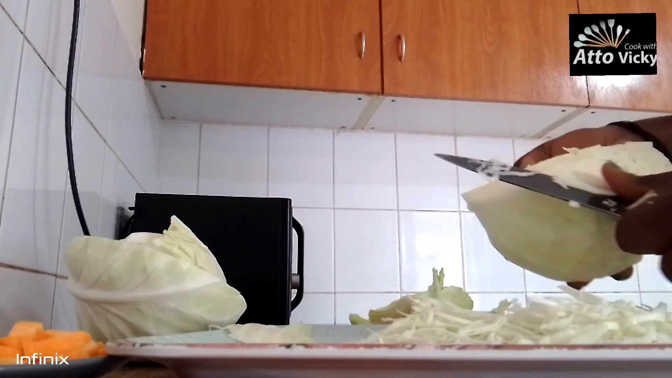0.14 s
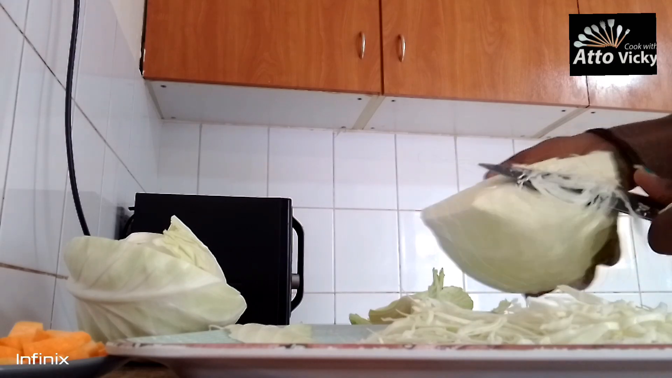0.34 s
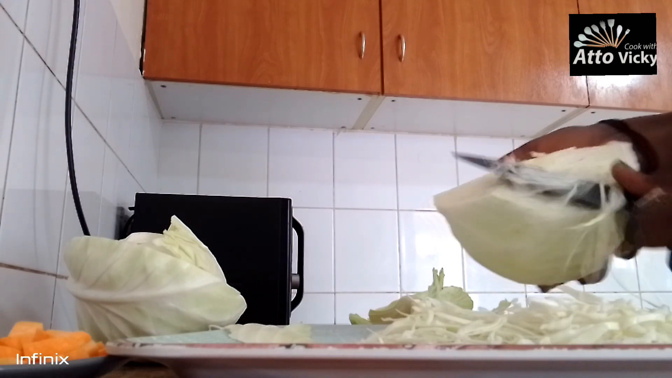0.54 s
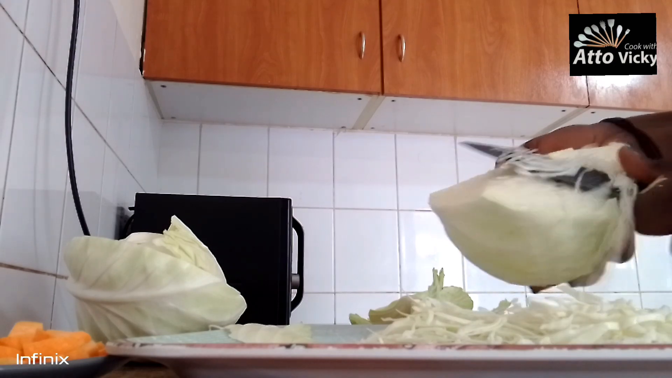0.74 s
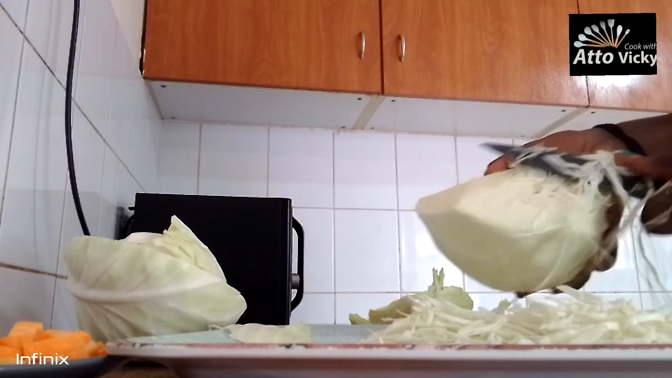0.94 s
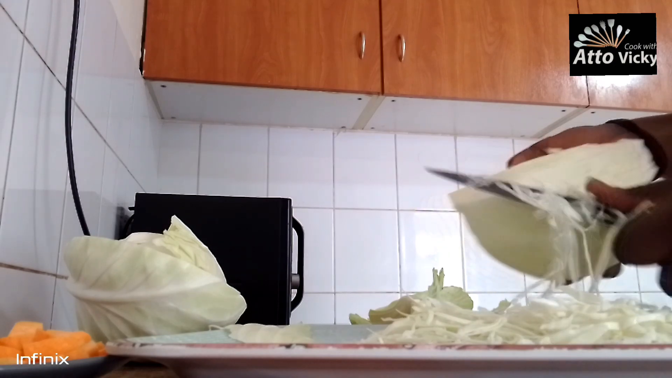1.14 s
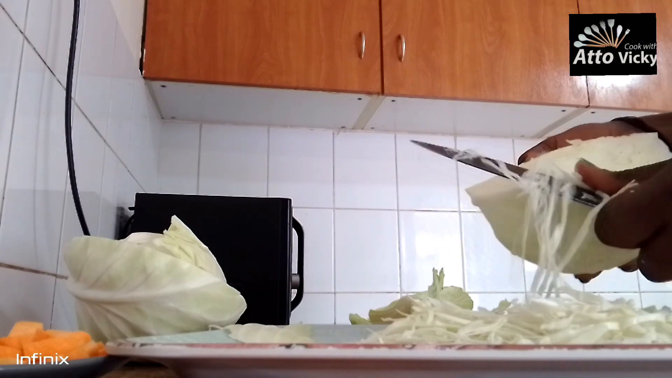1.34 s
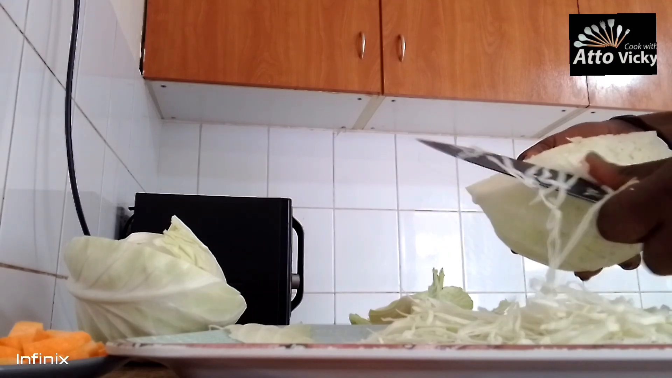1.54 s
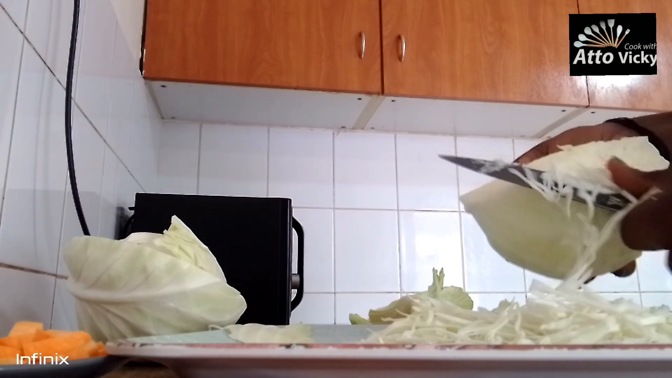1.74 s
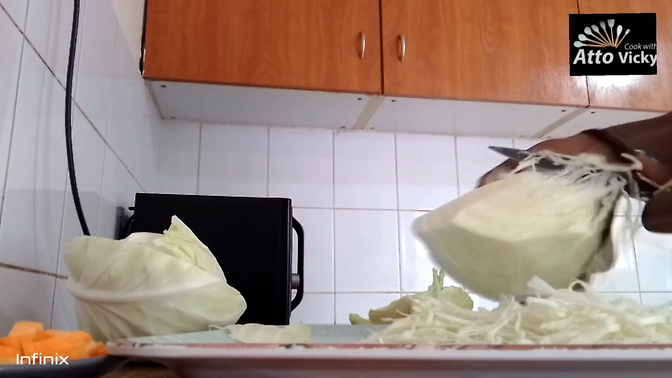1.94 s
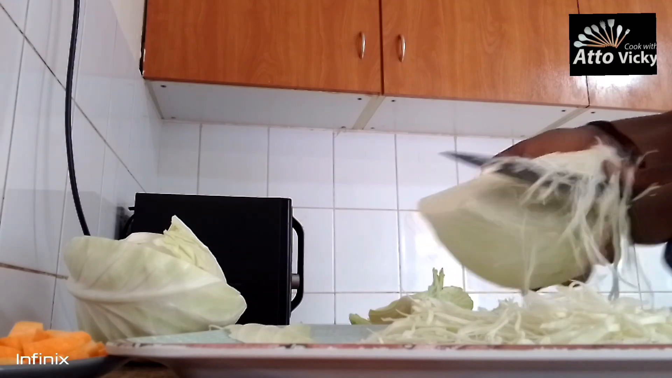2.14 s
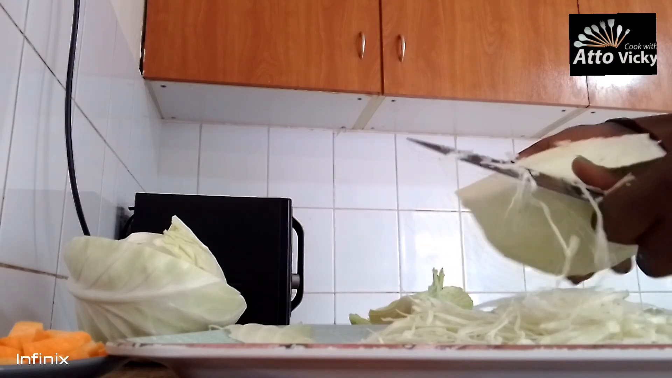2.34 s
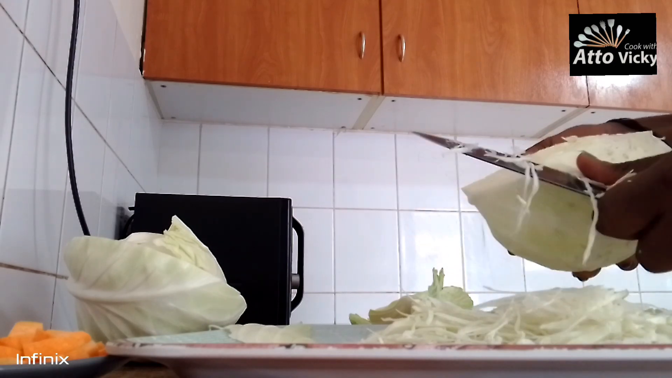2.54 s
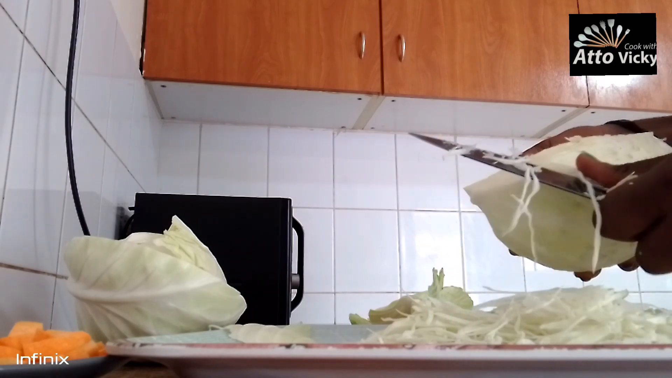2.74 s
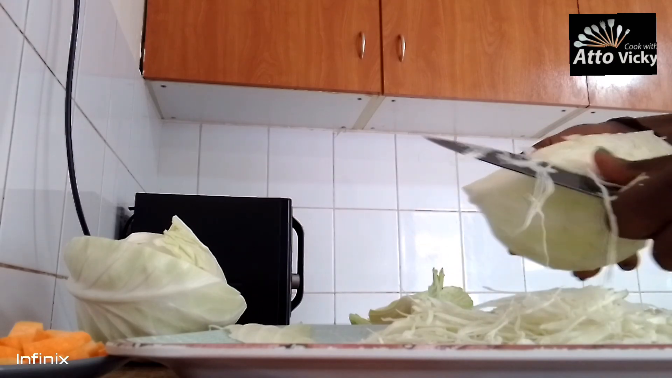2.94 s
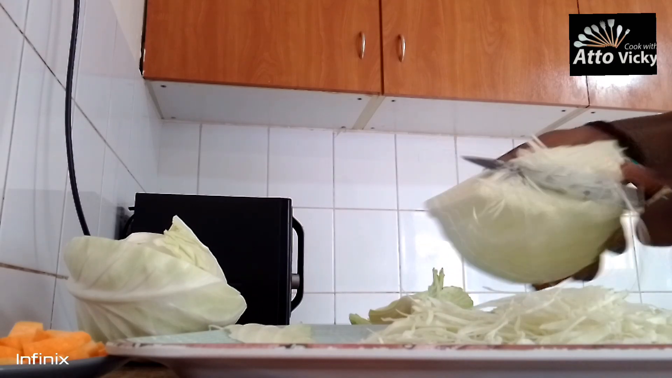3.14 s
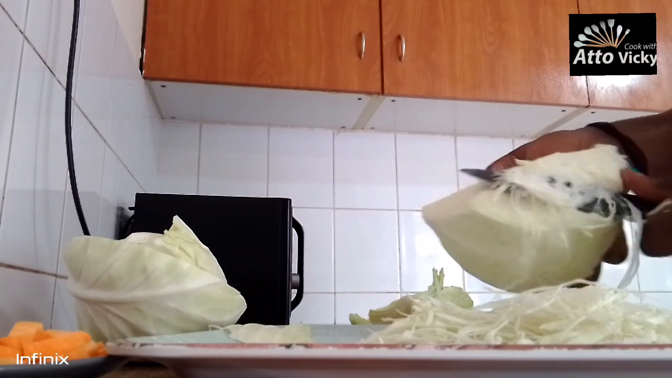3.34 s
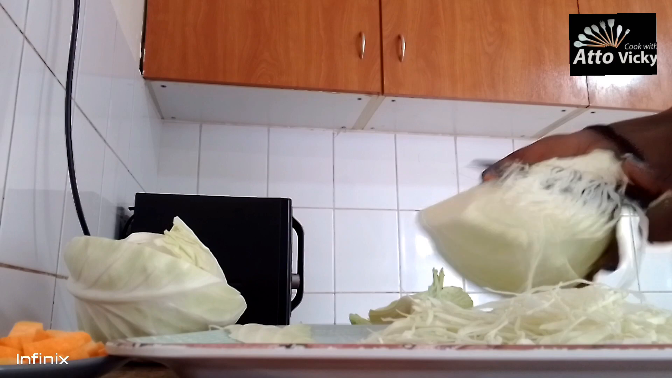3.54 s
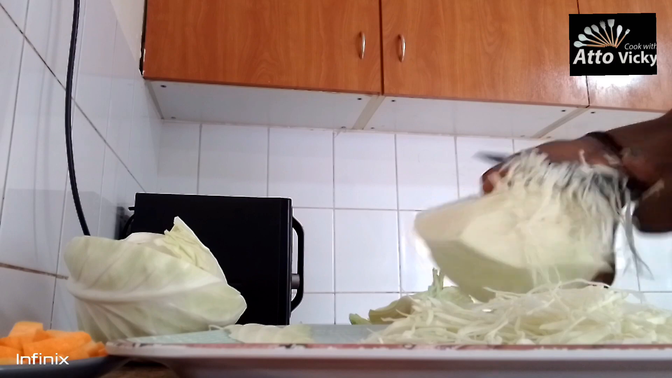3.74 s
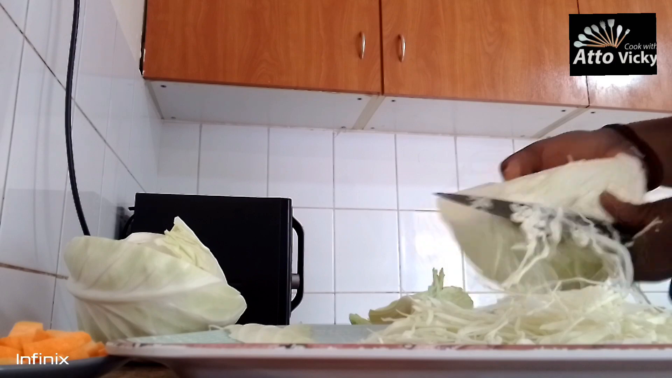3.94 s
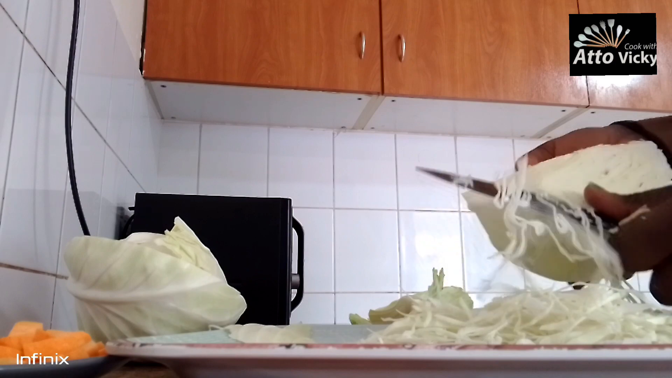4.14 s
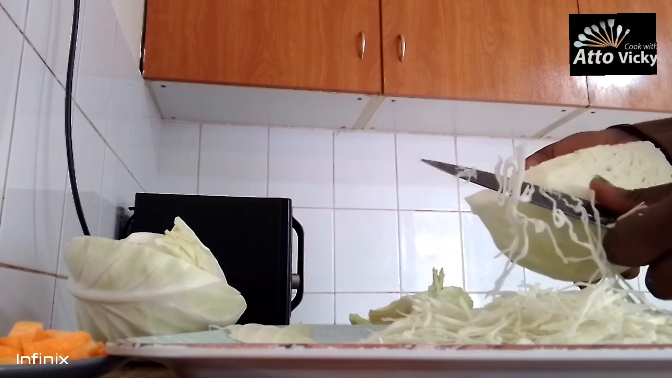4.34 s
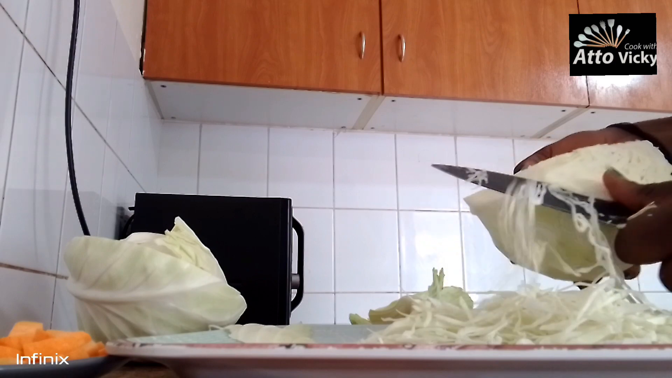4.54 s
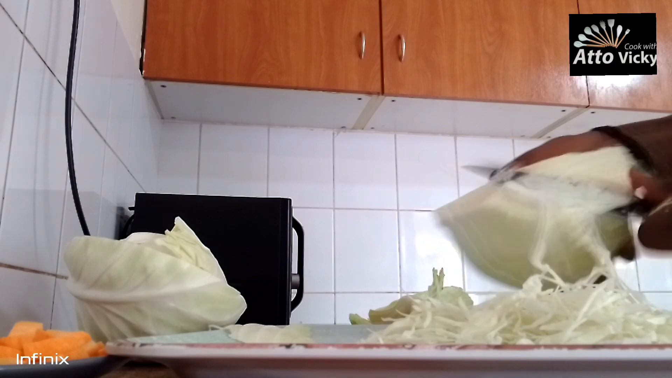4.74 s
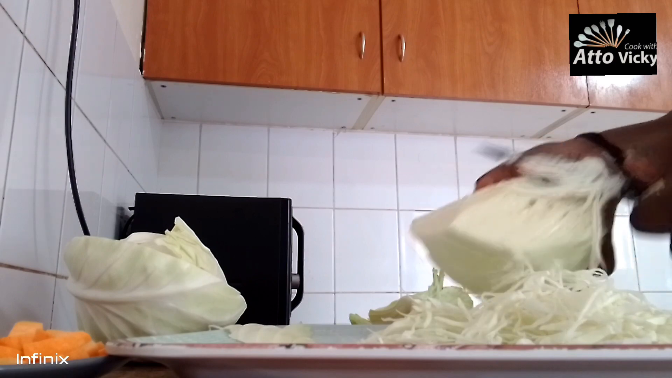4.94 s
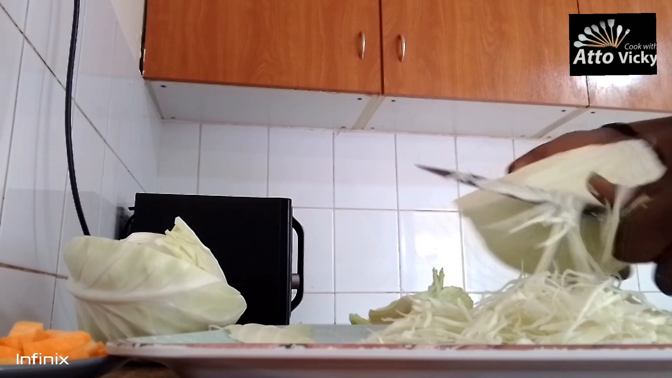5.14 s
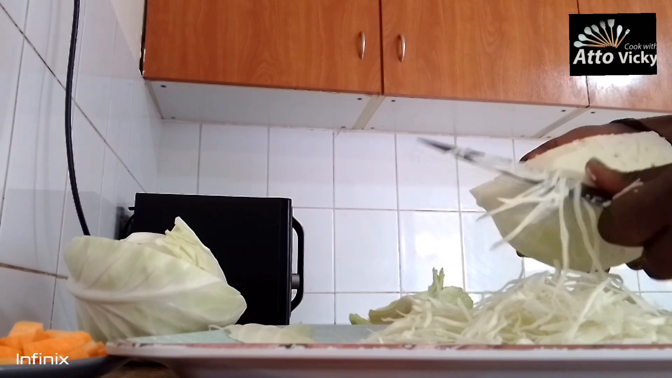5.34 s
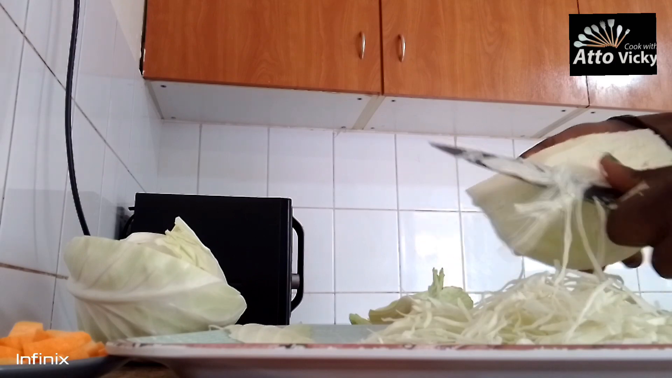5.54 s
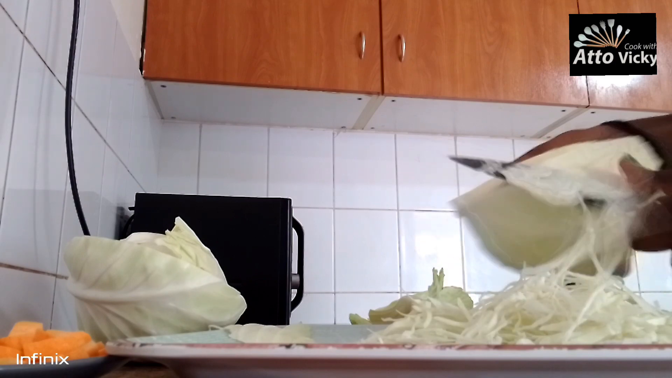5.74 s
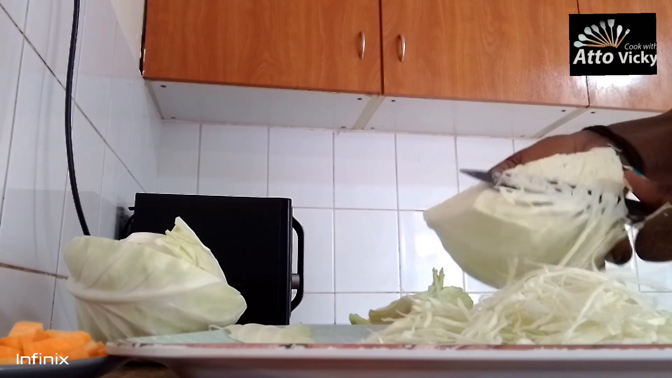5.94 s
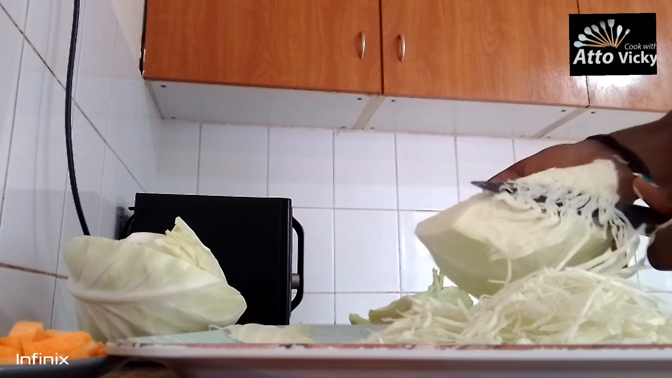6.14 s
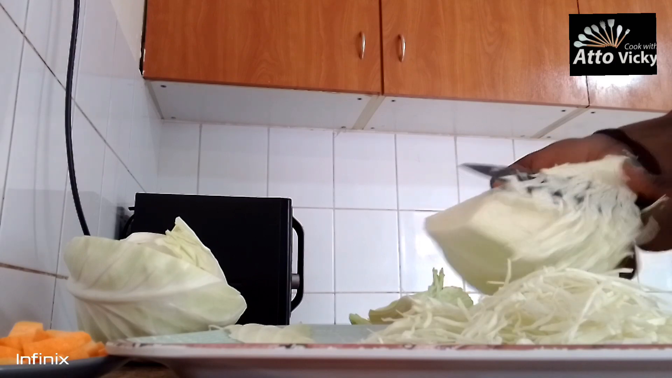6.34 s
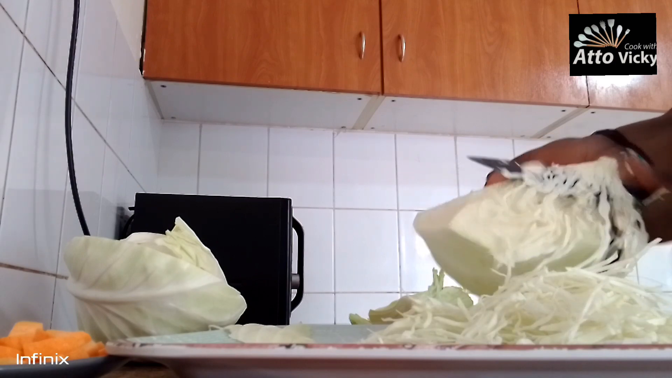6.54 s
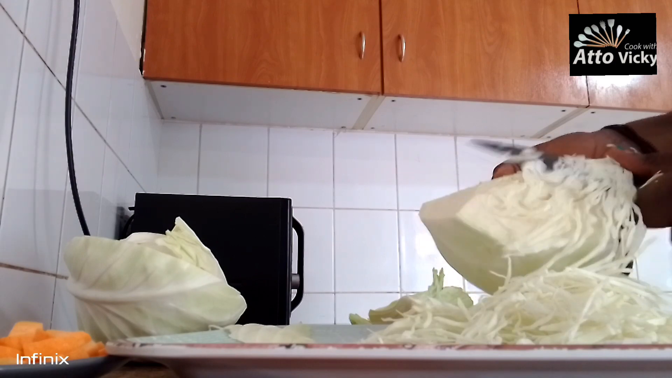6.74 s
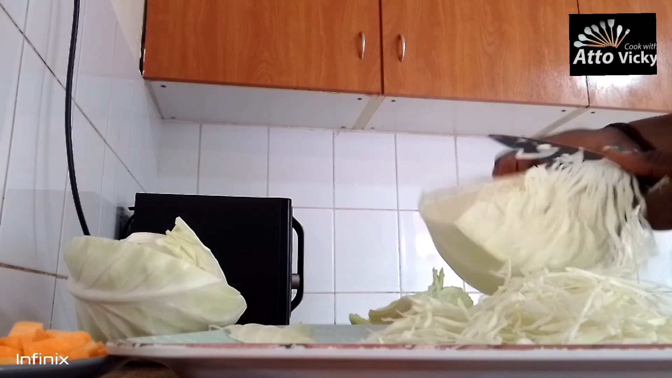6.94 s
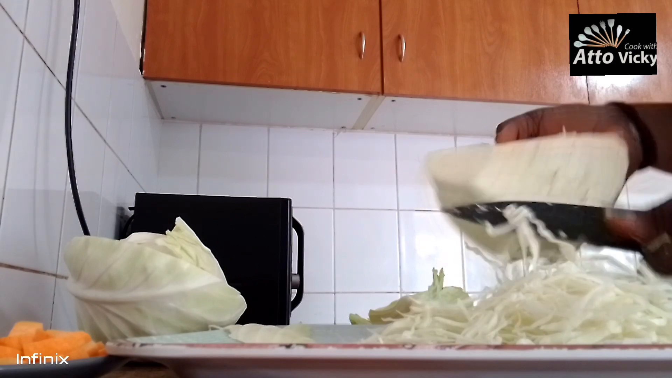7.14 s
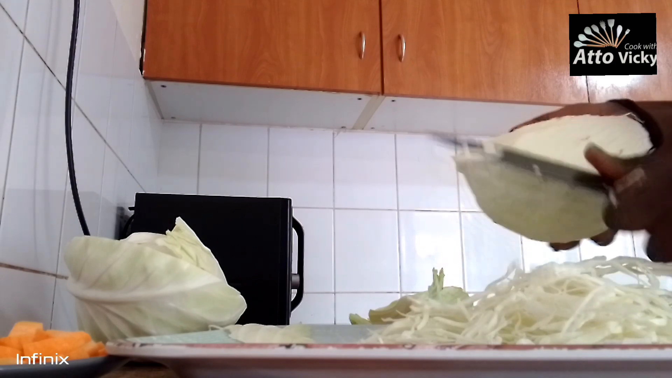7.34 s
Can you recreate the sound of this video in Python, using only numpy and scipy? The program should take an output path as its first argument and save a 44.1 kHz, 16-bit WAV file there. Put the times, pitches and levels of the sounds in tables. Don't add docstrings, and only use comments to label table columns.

```python
import sys
import numpy as np
from scipy import signal
from scipy.fft import rfft, irfft, next_fast_len
from scipy.io import wavfile
from scipy.ndimage import uniform_filter1d, map_coordinates

SR = 44100
rng = np.random.default_rng(int(sys.argv[2]) if len(sys.argv) > 2 else 0)


def store_pcm(level_fs):
    pcm = np.round(np.clip(level_fs, -1, 1) * 32767).astype(np.int16)
    wavfile.write(sys.argv[1], SR, np.atleast_2d(pcm).T)


def convert_level_to_amplitude(level_db):
    exponent = np.asarray(level_db, float) / 20
    return 10 ** exponent


N = 325458
STEP = 32

# frequency in Hz, density in dB per Hz.
AIR_SPECTRUM = [(15, -78), (25, -39.5), (174, -23.5), (290, -11.5), (400, -17), (458, -15.5), (650, -21),
                (898, -19.5), (1080, -25), (1910, -33.5), (2500, -35.5), (4400, -31), (5310, -34.5),
                (15600, -31.5)]
# frequency in Hz, width in Hz,
# gain in dB.
MIC_DUCT = [(166.6, 35, -22), (1878, 117, 11), (4670, 467.5, 4), (6230, 220, 6), (8140, 2800, 7.5),
            (10500, 400, -2), (14400, 400, 6.5)]
# frequency in Hz, rms level in dB.
FRIDGE_LINES = [(291, -76), (468, -94), (770, -94), (921, -87.5)]
# start in seconds, swell in seconds, peak in dB,
# dying in dB per second, edge scrape in dB re cells.
STROKES = [(.284, 0.16, -37, 290, -7), (.862, 0.048, -40, 172, -9), (.92, 0.044, -45.5, 230, -12),
           (1.88, 0.09, -35, 258, -8), (1.97, 0.043, -34, 206, -8), (3.047, .075, -39.5, 127, -10),
           (3.11, .117, -31.5, 144.5, -16.5), (3.611, 0.079, -31.5, 181.5, -16),
           (4.705, .051, -32.5, 189.5, -4.5), (4.775, 0.049, -31, 194, -6),
           (5.772, 0.039, -29.5, 155, -10.5), (5.82, 0.083, -32, 260, -6.5),
           (6.058, 0.064, -34.5, 260, -18), (6.412, .078, -33, 300, -17), (6.796, .062, -35.5, 320, -10),
           (6.918, .008, -41.5, 400, -17), (6.94, 0.047, -46, 220, -18)]
# start in seconds, swell in seconds, peak in dB, # dying in dB per second,
# edge scrape in dB re cells.
LIGHT_STROKES = [(.085, 0.098, -49.5, 500, -1), (.2, 0.028, -66.5, 70, 2), (.665, 0.018, -65, 180, 0),
                 (.74, .045, -57, 70, 1), (1.1, .1, -73.5, 40, -3), (1.285, .01, -68.5, 150, 1),
                 (1.59, .01, -64.5, 500, -5), (1.65, 0.014, -49, 92, -1.5), (1.73, 0.056, -48, 230, -3),
                 (2.965, 0.039, -59, 548.5, -0.5), (3.47, 0.039, -58.5, 430, -6),
                 (4.48, 0.033, -61, 400, 0), (4.545, 0.033, -48.5, 500, -2), (5.582, .06, -47.5, 260, -2),
                 (6.19, .08, -62.5, 79, -12), (6.3, 0.025, -52, 800, -8), (6.52, .04, -52, 70, -12),
                 (6.66, 0.013, -50.5, 300, -13), (7.15, .09, -65.5, 86, -16)]
# frequency in Hz, width in Hz, level in dB.
CELL_MODES = [(8720, 1560, 7.5), (7250, 1220, 0), (9700, 430, -12)]
# frequency in Hz, width in Hz, level in dB.
EDGE_MODES = [(11660, 5700, -7.5), (14000, 880, -2.5), (15840, 2100, -8)]
# frequency in Hz, width in Hz, level in dB.
LEAF_MODES = [(1846, 980, -11.5), (3370, 1320, -7.5), (4674, 800, 0), (5450, 910, 1.5), (6720, 610, 3)]
# start in seconds, swell in seconds, peak in dB,
# dying in dB per second, hollow tone in Hz.
HEAD_THUDS = [(.09, 0.072, -70, 166, 760), (.295, .15, -53.5, 165, 740), (.7, 0.056, -68, 40, 550),
              (.85, 0.042, -62.5, 70, 950), (1.665, .06, -61, 70, 800), (1.76, .05, -66.5, 240, 960),
              (1.885, 0.094, -49.5, 80, 800), (1.95, .12, -49, 220, 650), (2.98, 0.018, -66, 321, 640),
              (3.055, 0.027, -71, 30, 740), (3.18, .055, -54, 90, 700), (3.259, .06, -57, 299.5, 780),
              (3.62, 0.097, -49.5, 210.5, 865), (4.54, 0.055, -68.5, 221.5, 830),
              (4.705, 0.029, -54, 100, 744.6), (4.74, 0.079, -42, 145, 755), (5.585, 0.048, -64, 135, 860),
              (5.78, .03, -52.5, 40, 740), (5.864, .012, -44.5, 140, 660), (6.06, 0.064, -53.5, 125, 680),
              (6.41, .064, -56, 90, 950), (6.655, .011, -61, 199.5, 740), (6.81, 0.047, -55, 278, 695),
              (6.95, .04, -63.5, 185, 675)]
# frequency in Hz, width in Hz, level in dB.
HEAD_MODES = [(556, 373, 3), (780, 525, 3), (1005, 370, 2.5), (1309, 100, -2)]
# frequency in Hz, t60 in seconds.
WALL_T60 = [(300, 0.5), (800, 0.29), (2000, 0.6), (6000, 0.19), (15000, 0.4)]
# time in seconds, peak in dB.
RIB_SNAPS = [(0.2933, -34), (0.421, -20), (1.005, -38), (1.663, -31), (3.2662, -19), (3.3044, -24),
             (3.3232, -32), (3.3905, -36.5), (3.6566, -24), (5.5955, -30), (5.7846, -21), (6.0103, -36),
             (6.072, -31), (6.329, -34.5), (6.4451, -25.5), (6.504, -23), (6.6754, -28), (6.8274, -24),
             (6.8439, -23), (6.9235, -37), (6.9838, -33.5), (6.9982, -34), (7.0044, -37.5), (7.0113, -40.5),
             (0.0977, -44),
    (1.8881, -27),
    (3.0551, -32.5),
    (4.557, -34),
    (5.7907, -22.5),
    (5.812, -31),
    (6.4519, -22),
    (6.4964, -14),
    (6.8585, -31),
]
# time in seconds, peak in dB.
FAINT_SNAPS = [(0.8318, -46), (1.124, -49), (1.3172, -54.5), (1.5287, -60.6), (1.6037, -46), (3.5207, -45),
               (3.9783, -51), (3.987, -45), (4.493, -53.9), (4.4997, -46), (4.522, -42.5), (4.5333, -55),
               (4.5482, -47), (5.0539, -59), (5.7513, -56), (6.2365, -39.5), (6.746, -48), (6.7873, -46),
               (7.0528, -45)]
# start in seconds, length in seconds, frequency in Hz,
# width in Hz, rms level in dB.
FLANK_SQUEAKS = [(1.76, 0.12, 1000, 130, -68), (6.84, 0.099, 2800, 270, -79), (3.63, 0.13, 6300, 890, -56),
                 (6.43, 0.07, 4900, 1100, -55.5), (1.9, 0.19, 1000, 140, -62),
                 (4.72, 0.13, 12000, 590, -50), (3.15, 0.16, 5600, 1500, -52),
                 (0.332, 0.19, 5800, 1600, -55.5), (0.877, 0.15, 2800, 1700, -63),
                 (.88, .15, 5800, 1100, -62), (5.62, 0.12, 8200, 840, -51.5), (6.68, 0.08, 9000, 1400, -55),
                 (6.88, 0.072, 5500, 1100, -57), (1.93, 0.19, 2900, 1340, -60.5),
                 (1.75, .14, 7400, 220, -68), (1.75, .12, 10000, 420, -56.5),
                 (3.046, 0.064, 1850, 250, -70.5), (4.74, 0.038, 1750, 80, -59),
                 (4.813, 0.047, 1750, 160, -63), (6.46, 0.27, 1900, 140, -75.5), (5.9, .22, 3900, 300, -73),
                 (7.16, 0.24, 4700, 1300, -79.5), (6.867, 0.097, 11100, 360, -61)]
# start in seconds, swell in seconds, peak in dB, dying in dB per second,
# tray tone in Hz.
SHRED_LANDINGS = [(.58, .105, -62.5, 37, 445), (1.95, 0.094, -54.5, 76, 502), (2.2, 0.036, -67.5, 139, 460),
                  (3.11, .11, -58, 149, 460), (3.31, 0.075, -68, 26, 478), (3.68, 0.051, -58, 179, 503),
                  (3.82, 0.058, -71, 280, 424), (4.949, 0.17, -58, 200, 495),
                  (5.15, 0.068, -58, 185.5, 465), (5.31, 0.035, -67, 50, 412),
                  (5.78, .03, -61, 40.5, 478.7), (5.96, .03, -60.5, 100, 522), (6.1, .032, -63, 392, 535)]


def unit(x):
    return x / np.sqrt(np.mean(x ** 2) + 1e-20)


def along(points, hz):
    f, v = np.transpose(points)
    return np.interp(np.log(hz + 1), np.log(f + 1), v)


def wobble(knots_per_s):
    knots = rng.standard_normal(int(N * knots_per_s / SR) + 4)
    return map_coordinates(knots, [np.arange(N) * knots_per_s / SR])


def filtered(x, response):
    m = next_fast_len(N + SR // 2)
    return irfft(rfft(x, m) * response(np.fft.rfftfreq(m, 1 / SR)), m)[:N]


def resonant(x, modes):
    def response(f):
        total = 0
        for k, (hz, width_hz, db) in enumerate(modes):
            damping = 1j * f * width_hz
            total = total + (-1) ** k * convert_level_to_amplitude(db) * damping / (hz * hz - f * f + damping)
        return total
    return filtered(x, response)


def bursts(share, spread_db):
    when, sign, size = rng.random((3, N))
    return (when < share) * np.sign(sign - .5) * convert_level_to_amplitude(-spread_db * np.log(size + .006))


def gliding(x, hz, width_hz):
    pole = np.exp(-np.pi * width_hz / SR)
    slow = signal.lfilter([1], np.convolve([1, -pole], [1, -pole]), x + 1j * x[::-1])
    return unit(np.real(slow * np.exp(2j * np.pi * np.cumsum(hz) / SR)))


def patchy(x, depth_db):
    def power(v):
        return np.abs(uniform_filter1d(np.sum(np.abs(v) ** 2, 0), size=12)) + 1e-20

    z = signal.stft(x, nperseg=256)[2]
    field = uniform_filter1d(rng.standard_normal(z.shape), size=2, axis=0)
    field = uniform_filter1d(field, size=40, axis=1)
    combed = z * convert_level_to_amplitude(depth_db * unit(field))
    return signal.istft(combed * np.sqrt(power(z) / power(combed)), nperseg=256)[1][:N]


def swells(rows, entry_db, bend, after_db=-21, slower=1):
    grip_s, grip_db, nearing_db_per_s, after_db_per_s = 0.0138, 15, 752, 100
    start, swell, peak, dying = np.transpose(rows)[:4, :, None]
    t = np.arange(0, N + STEP, STEP) / SR - start
    late = np.maximum(t - swell, 0)
    rise_db = peak - entry_db * np.clip(1 - t / swell, 0, 1) ** bend
    rise_db = rise_db - grip_db * np.clip(1 - t / grip_s, 0, 1)
    rise_db = rise_db + nearing_db_per_s * np.minimum(t, 0)
    fade = convert_level_to_amplitude(-2 * dying / slower * late)
    settling = convert_level_to_amplitude(2 * (after_db - after_db_per_s * late))
    return convert_level_to_amplitude(2 * rise_db) * (fade + settling)


def fine(x):
    return np.interp(np.arange(N), np.arange(len(x)) * STEP, x)


def effort(power):
    return fine(np.sqrt(power.sum(0) + 1e-20))


def level_and_tone(power, rows, sag_hz_per_s=0):
    total = power.sum(0) + 1e-20
    start, swell, _, _, hz = np.transpose(rows)[:, :, None]
    since_peak = np.arange(power.shape[1]) * STEP / SR - start - swell
    hz = hz - sag_hz_per_s * np.clip(since_peak, -.3, .3)
    tone = (np.sum(hz * power, 0) + 1e-20 * hz[0]) / total
    return fine(np.sqrt(total)), fine(tone)


def thud_power():
    return swells(HEAD_THUDS, entry_db=9.5, bend=1.234, after_db=-24)


def background():
    def response(f):
        duct_db = sum(db / (1 + ((f - hz) / width_hz * 2) ** 2) for hz, width_hz, db in MIC_DUCT)
        return convert_level_to_amplitude(along(AIR_SPECTRUM, f) + duct_db)

    air = filtered(rng.standard_normal(N), response)
    t = np.arange(N) / SR
    hum = np.zeros(N)
    for hz, db in FRIDGE_LINES:
        level = convert_level_to_amplitude(db + 3 + 1.2 * wobble(5) + 1.5 * wobble(25))
        hum += level * np.sin(2 * np.pi * hz * t + 0.72 * wobble(4))
    return convert_level_to_amplitude(-69.5 + 0.65 * wobble(1.567)) * unit(air) + hum


def knife():
    force_share, depth_share, shallow_db = .12, 0.45, -25
    rows = STROKES + LIGHT_STROKES
    cells_gain = effort(swells(rows, entry_db=13.5, bend=1.3))
    scrape = convert_level_to_amplitude(2 * np.transpose(rows)[4])[:, None]
    edge_gain = effort(swells(rows, entry_db=4.5, bend=1.3, after_db=-26, slower=0.88) * scrape)
    depth = np.clip(effort(thud_power()) / cells_gain + convert_level_to_amplitude(shallow_db), 0, .6)
    leaf_gain = convert_level_to_amplitude(0.95) * cells_gain ** (1 + force_share) * depth ** depth_share

    layers = wobble(90)
    pops = convert_level_to_amplitude(1.54 * layers + 1.0 * wobble(500)) * bursts(.2, spread_db=0.8)
    cells = unit(resonant(resonant(pops, CELL_MODES), [(8540, 5100, 0)]))
    edge = unit(resonant(convert_level_to_amplitude(.7 * layers) * bursts(.3, spread_db=3.0), EDGE_MODES))
    leaf = unit(resonant(convert_level_to_amplitude(1.7 * layers) * bursts(.15, spread_db=1.1), LEAF_MODES))
    return convert_level_to_amplitude(-0.64) * (cells_gain * cells + edge_gain * edge + leaf_gain * patchy(leaf, depth_db=2.5))


def head():
    gain, hz = level_and_tone(thud_power(), HEAD_THUDS)
    thuds = convert_level_to_amplitude(1.27 * wobble(40)) * bursts(.04, spread_db=0.96)
    body = unit(resonant(resonant(thuds, HEAD_MODES), [(770, 1040, 0)]))
    hollow = gliding(thuds, hz, width_hz=240)
    return convert_level_to_amplitude(-5) * gain * (body + convert_level_to_amplitude(2.0) * hollow)


def walls(x):
    hz, t, z = signal.stft(rng.standard_normal(SR // 2), SR, nperseg=256)
    decay = convert_level_to_amplitude(-60 * t / along(WALL_T60, hz)[:, None])
    tail = signal.istft(z * decay, SR, nperseg=256)[1]
    delayed = np.pad(x, (200, 0))
    return signal.fftconvolve(delayed, tail / np.linalg.norm(tail))[:N]


def ribs():
    length = 300
    rows = RIB_SNAPS + FAINT_SNAPS
    t = np.arange(length) / SR
    cracks = rng.standard_normal((len(rows), length)) * convert_level_to_amplitude(-60 * t / 0.0025)
    ring = np.zeros(length)
    for hz, width_hz, db in CELL_MODES + [(5760, 730, -27), (12900, 2500, -17)]:
        ring += convert_level_to_amplitude(db) * width_hz * np.exp(-np.pi * width_hz * t) * np.sin(2 * np.pi * hz * t)
    cracks = signal.fftconvolve(cracks, ring[None], axes=1)[:, :length]
    out = np.zeros(N + length)
    for (start, db), crack in zip(rows, cracks):
        out[round(start * SR):][:length] += convert_level_to_amplitude(db - 0.5) * crack / np.abs(crack).max()
    out = resonant(out[:N], [(8400, 5000, 1.5)])
    return filtered(out, lambda f: (1j * f / (1j * f + 3000)) ** 4) * convert_level_to_amplitude(2.5)


def squeaks():
    t, out = np.arange(N) / SR, np.zeros(N)
    for start, length, hz, width_hz, db in FLANK_SQUEAKS:
        u = np.clip((t - start) / length, 0, 1)
        hiss = gliding(rng.standard_normal(N), np.full(N, hz), width_hz)
        out += convert_level_to_amplitude(db + 3.5) * np.sin(np.pi * u ** 0.56) * hiss
    return out


def tray():
    power = swells(SHRED_LANDINGS, entry_db=8.5, bend=1.1, after_db=-16.5)
    gain, hz = level_and_tone(power, SHRED_LANDINGS, sag_hz_per_s=150)
    return convert_level_to_amplitude(0.6) * gain * gliding(bursts(0.025, spread_db=1.5), hz, width_hz=80)


def scene():
    cutting = patchy(knife(), depth_db=3) + patchy(head(), depth_db=1.0) + ribs() + squeaks()
    near = cutting + convert_level_to_amplitude(-8.5) * walls(cutting) + tray()
    near = filtered(near, lambda f: (1j * f / (1j * f + 190)) ** 3)
    return (near + background())[None]


def band_limit(x):
    return signal.sosfilt(signal.butter(12, 15750, fs=SR, output="sos"), x)


def record(dry):
    mix = filtered(dry[0], lambda f: f < 15750)[None]
    return band_limit(mix)


dry = scene()
out = record(dry)
store_pcm(out)
```